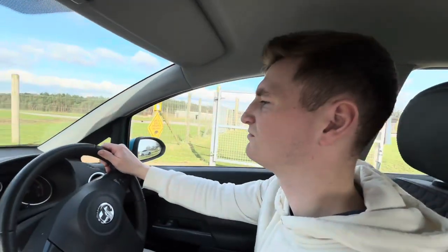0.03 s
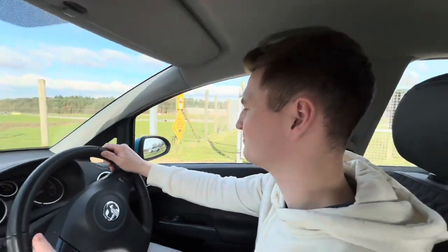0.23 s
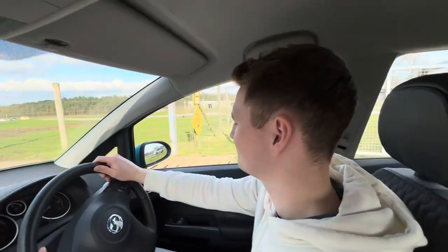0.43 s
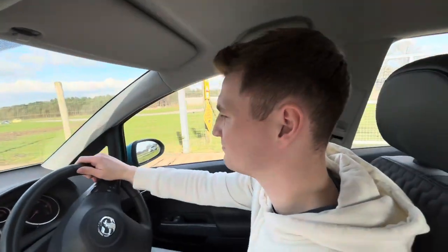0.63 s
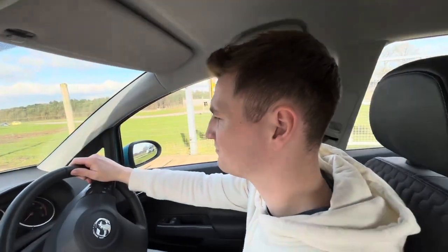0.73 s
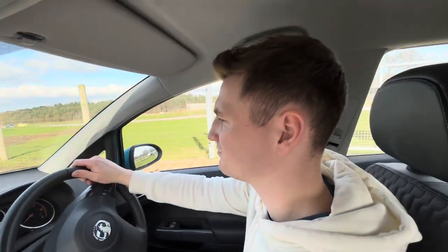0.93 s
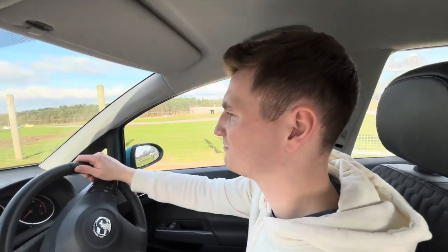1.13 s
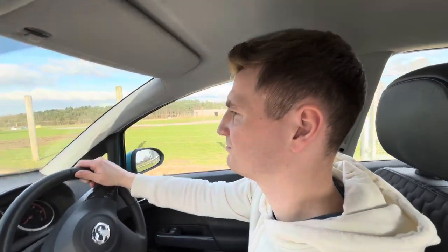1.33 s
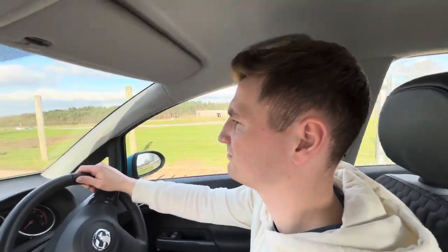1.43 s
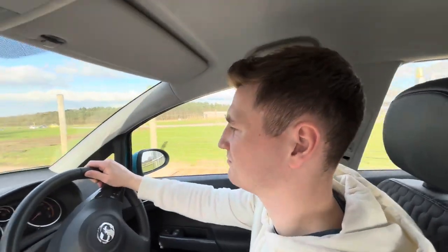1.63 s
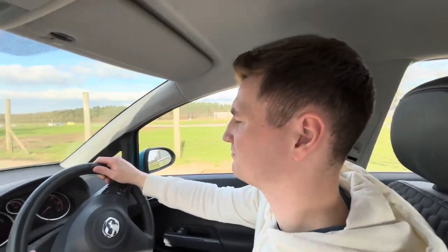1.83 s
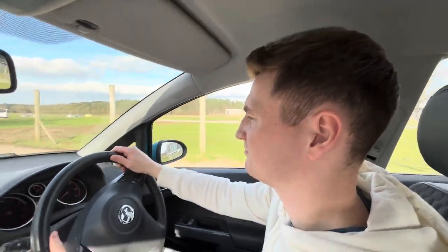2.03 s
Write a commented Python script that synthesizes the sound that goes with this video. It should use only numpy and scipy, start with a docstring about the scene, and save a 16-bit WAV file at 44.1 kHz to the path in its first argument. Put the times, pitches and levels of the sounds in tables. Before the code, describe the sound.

Car cabin rumble, deep and uneven, swelling with stone knocks, rut thuds, gritty crunch and trim ticks

```python
"""Inside a small car that rolls slowly onto a rough track; two seconds told in order. Boom (a wavering sine)
and judder (low noise) open with a few stone knocks (swelling sines), an early clack (ringing noise) and a
hollow bump with a firm thud. At 0.3 s the rumble swells with dense knocks, tyre drone, more clacks and
crunching grit (random grains). From 0.7 s wheels thud into ruts and loose trim ticks (ringing modes); from 1 s
come scuffs and brushing (grains), probably hands and sleeves at the wheel. A dry snap falls at 1.6 s over hiss."""
import sys
import numpy as np
from scipy import signal
from scipy.io import wavfile
from scipy.ndimage import uniform_filter1d

SR = 44100
rng = np.random.default_rng(int(sys.argv[2]) if len(sys.argv) > 2 else 0)


def generate_wav(sig):
    """Save sig (samples, or channels by samples) to the path in sys.argv[1] as 16-bit PCM at SR."""
    pcm = np.round(np.clip(np.atleast_2d(sig).T, -1, 1) * 32767).astype(np.int16)
    wavfile.write(sys.argv[1], SR, pcm)


N = 91287
T = np.arange(N) / SR  # seconds


def from_db(db):
    """Decibels to gain."""
    return 10 ** (np.asarray(db) / 20)


def rms_one(x):
    """Scale to unit power."""
    return x / np.sqrt(np.mean(x ** 2) + 1e-20)


def level(rows):
    """Gain over time, gliding in dB between (s, dB) rows."""
    return from_db(np.interp(T, *np.transpose(rows)))


def at_hz(points, hz):
    """Read a spectrum on a log-frequency axis."""
    freqs, values = np.transpose(points)
    return np.interp(np.log(hz), np.log(freqs), values)


def pan(db):
    """Left and right gains for a left-minus-right level difference."""
    return from_db(np.array([[db], [-db]]) / 2)


def drift(rate_hz):
    """Slow random wander with spread 1: noise through two equal one-pole lowpasses."""
    step = 40  # samples between the points of the wander
    r = np.exp(-2 * np.pi * step * rate_hz / SR)
    settle = 2000  # points dropped while the filter settles
    points = rng.standard_normal(N // step + 2 + settle)
    slow = signal.lfilter([1], [1, -2 * r, r * r], points)[settle:]
    return np.interp(np.arange(N) / step, np.arange(len(slow)), rms_one(slow))


def band_filter(x, cutoff_hz, kind):
    """Second-order Butterworth filter."""
    return signal.sosfilt(signal.butter(2, cutoff_hz, kind, fs=SR, output="sos"), x)


def noise():
    """Unrelated white noises for even and odd bands, middle and side."""
    return rng.standard_normal((2, 2, N))


def grains(per_s, spread_db):
    """Random tiny impacts of uneven size, in the same layout as noise()."""
    born = rng.random(N) < per_s / SR
    hits = noise() * born
    size_db = spread_db * np.minimum(rng.exponential(1, N), 4)
    return rms_one(hits * from_db(size_db)) + 1e-18


# Stereo likeness of the coloured noises. Each row: frequency in Hz, likeness from -1 to 1 (clipped beyond).
LIKENESS = [(60, 0.66), (130, 1.1), (290, 0.48), (520, 0), (850, -0.07), (1410, .5), (3100, 0.2),
            (9000, -0.18), (12000, 1.2)]
# Their stereo balance. Each row: frequency in Hz, left minus right level in dB.
BALANCE = [(40, 6.5), (70, 0.5), (160, -0.5), (350, 0.5), (700, 3.5), (1300, 3), (2400, 1.5), (4400, 7.5),
           (8000, -0.5), (13000, -5.5)]


def coloured(drive, colour, patchy_db):
    """Shape a drive in third-octave stereo bands, each flickering by itself; unit power."""
    out = np.zeros((2, N))
    edges = 22 * 2 ** (np.arange(30) / 3)
    for k, (low, high) in enumerate(zip(edges, edges[1:])):
        hz = np.sqrt(low * high)
        flicker = drift(8.9)
        if not colour[0][0] / 2 < hz < colour[-1][0] * 2:
            continue
        mid, side = band_filter(drive[k % 2], [low, high], "band")
        alike = np.clip(at_hz(LIKENESS, hz), -1, 1)
        stereo = np.sqrt(1 + alike) * mid + np.sqrt(1 - alike) * side * [[1], [-1]]
        gain = from_db(at_hz(colour, hz) + patchy_db * flicker) * pan(at_hz(BALANCE, hz))
        out += gain * stereo
    return rms_one(out)


def steadied(x, share, span_s):
    """Even out the chance swells of a narrow noise; share 1 would flatten them fully."""
    power = uniform_filter1d(np.mean(x ** 2, axis=0), int(span_s * SR))
    return rms_one(x / (power + 1e-6) ** (share / 2))


def strokes(rows):
    """Summed envelopes that rise straight and die away exponentially."""
    out = 0
    for s, db, rise, decay in rows:
        attack = np.clip((T - s) / rise, 0, 1)
        out = out + from_db(db) * attack * np.exp(-np.maximum(T - s - rise, 0) / decay)
    return out


def thud(s, hz, rise_s):
    """A cushioned blow: a resonance that swells for rise_s and then dies."""
    age = np.maximum(T - s, 0)
    swell = (age / rise_s * np.exp(1 - age / rise_s)) ** 2
    return swell * np.sin(2 * np.pi * hz * age)


def resonate(x, modes):
    """Parallel two-pole resonances of (Hz, gain dB, width Hz)."""
    out = 0
    for hz, gain_db, width_hz in modes:
        r = np.exp(-np.pi * width_hz / SR)
        zeros = [(1 - r * r) / 2, 0, (r * r - 1) / 2]
        poles = [1, -2 * r * np.cos(2 * np.pi * hz / SR), r * r]
        out = out + from_db(gain_db) * signal.lfilter(zeros, poles, x)
    return out


CABIN_T60_S = 0.094
CABIN_DB, CRUNCH_CABIN_DB = -10, -7  # tail against direct sound, for blows and for the crunch


def cabin(x, wet_db):
    """Direct sound plus a short padded tail, different at each ear; the power stays about the same."""
    age = T[:SR // 4]
    tail = rng.standard_normal((2, len(age))) * from_db(-60 * age / CABIN_T60_S)
    tail /= np.sqrt(np.sum(tail ** 2, axis=1, keepdims=True))
    wet = from_db(wet_db)
    reverb = signal.fftconvolve(np.atleast_2d(x), tail, axes=1)[:, :N]
    return (x + wet * reverb) / np.hypot(1, wet)


# The tyres strike stones. Each row: start in seconds, level in dB before KNOCK_DB, pitch of the knock in Hz.
KNOCKS = [(0.05, -27.5, 194), (0.265, -28.5, 202), (.352, -12, 144.4), (0.438, -15, 217),
          (0.461, -15.5, 228.5), (.495, -12, 172), (.556, -11, 204), (0.583, -11, 177), (.694, -22.5, 174),
          (.737, -12.5, 163.3), (.772, -25, 222), (0.815, -14, 195), (.860, -22.5, 248), (.941, -10, 173),
          (0.989, -19.5, 215), (1.064, -13, 213.5), (1.094, -17, 217), (1.166, -12, 193), (1.326, -13, 170),
          (1.406, -7.5, 189), (1.451, -15, 218), (1.533, -14, 197.6), (1.662, -11.5, 172),
          (1.781, -13, 187), (1.826, -18, 194), (1.869, -13.5, 169), (1.905, -16, 204), (1.935, -11.5, 194)]
KNOCK_RISE_S, KNOCK_DB, KNOCK_PAN_DB = 0.0054, -2.5, 1.8
KNOCK_OVERTONE, KNOCK_OVERTONE_DB = 1.454, -14  # pitch ratio, level against the main pitch
# Swell of the tyres' drone. Each row: time in seconds, level in dB.
DRONE = [(0, -42), (.19, -46.5), (.28, -36.5), (.45, -33), (.85, -28.5), (1.1, -36), (1.27, -43),
         (1.45, -32.5), (1.7, -30.5), (2.05, -30.5)]
# Tone of the drone. Each row: frequency in Hz, relative density in dB per Hz.
DRONE_COLOUR = [(80, -18.5), (140, -6), (220, 2.5), (270, -8), (340, -11.5), (450, -16.5), (800, -35.5)]


def tyres():
    """Small stones keep the tyres droning as low noise; larger ones give hollow two-pitch knocks."""
    drone = steadied(coloured(noise(), DRONE_COLOUR, patchy_db=1.0), share=0.68, span_s=0.018)
    knocks = 0
    for s, db, hz in KNOCKS:
        overtone = from_db(KNOCK_OVERTONE_DB) * thud(s, hz * KNOCK_OVERTONE, KNOCK_RISE_S)
        knocks = knocks + from_db(db + KNOCK_DB) * (thud(s, hz, KNOCK_RISE_S) + overtone)
    return level(DRONE) * drone + cabin(knocks, CABIN_DB) * pan(KNOCK_PAN_DB)


# A wheel drops into a rut. Each row: start in seconds, level in dB before RUT_DB, pitch in Hz.
RUTS = [(0.756, -18, 73), (0.837, -15, 65.7), (1.331, -13.5, 75.2), (1.452, -16, 70), (1.555, -16, 75.6),
        (1.622, -14.5, 103), (1.733, -11, 108), (1.802, -9, 94.3), (1.925, -13.5, 86.5),
        (1.989, -20.5, 68.6)]
RUT_RISE_S, RUT_DB = 0.01, 3
# Swell of the suspension's judder. Each row: time in seconds, level in dB before JUDDER_DB.
JUDDER = [(0.0, -36.5), (0.22, -39), (0.32, -26), (0.8, -22.5), (0.91, -26), (1.32, -29), (1.35, -22.5),
          (1.42, -32), (1.47, -22), (1.51, -29.5), (1.55, -19.5), (2.05, -21)]
# Tone of the judder. Each row: frequency in Hz, relative density in dB per Hz.
JUDDER_COLOUR = [(25, -13.5), (45, -12.5), (62, 0.5), (85, -1.5), (115, -10), (150, -11.5), (220, -23.5),
                 (400, -47.5)]
JUDDER_DB, JUDDER_STEADINESS = 3, 0.74


def suspension():
    """Judder of steadied low noise that swells and dips, and a heavy, low resonant thud at each rut."""
    judder = steadied(coloured(noise(), JUDDER_COLOUR, patchy_db=0.5), JUDDER_STEADINESS, span_s=0.053)
    ruts = sum(from_db(db + RUT_DB) * thud(s, hz, RUT_RISE_S) for s, db, hz in RUTS)
    return from_db(JUDDER_DB) * level(JUDDER) * judder + cabin(ruts, CABIN_DB)


# Swell of the cabin's deepest boom. Each row: time in seconds, level in dB before BOOM_DB and flutter.
BOOM = [(0.0, -28.5), (0.11, -34), (0.22, -49), (0.32, -27.5), (0.68, -21.5), (0.99, -36), (1.1, -23),
        (1.38, -25.5), (1.4, -33), (1.59, -21), (1.84, -35), (1.87, -23), (1.89, -30), (2.05, -21.5)]
BOOM_HZ, BOOM_WANDER_HZ = 40.5, 2.64  # centre and spread of the pitch
BOOM_DB, BOOM_FLUTTER_DB, BOOM_PAN_DB = 1.5, -1.2, 3.8


def boom():
    """The cabin air throbs around one deep, unsteady pitch."""
    phase = 2 * np.pi * np.cumsum(BOOM_HZ + BOOM_WANDER_HZ * drift(5.83)) / SR
    flutter = from_db(BOOM_DB + BOOM_FLUTTER_DB * drift(6.1))
    return level(BOOM) * flutter * np.sqrt(2) * np.sin(phase) * pan(BOOM_PAN_DB)


# Swell of the grit under the tyres. Each row: time in seconds, level in dB before GRIT_DB.
GRIT = [(.19, -54), (.29, -49), (.40, -50.5), (.48, -49), (.85, -47), (1.0, -46.5), (1.15, -50),
        (1.29, -53.5), (1.33, -48.5), (1.40, -47), (1.55, -46), (1.65, -39), (1.87, -44.5), (2.05, -44)]
# Tone of its crunch. Each row: frequency in Hz, relative density in dB per Hz.
GRIT_COLOUR = [(200, -4), (420, 1.5), (580, -3), (820, -7.5), (1100, -9.5), (1800, -15), (3000, -19.5),
               (4500, -28), (7000, -30), (10000, -35), (12000, -47)]
GRIT_DB, STONES_PER_S, STONE_SPREAD_DB = 5.5, 2500, 2.5
# Dull scuffs, probably tyres shoving loose dirt.
# Each row: start in seconds, relative level in dB, rise in seconds, decay in seconds.
SCUFFS = [(1.0, -38, 0.01, 0.024), (1.455, -35.5, 0.014, 0.035), (1.599, -34, 0.008, 0.02),
          (1.620, -31, 0.0046, 0.013), (1.725, -29, 0.02, 0.019)]
# Tone of the scuffs. Each row: frequency in Hz, relative density in dB per Hz.
SCUFF_COLOUR = [(200, -12), (450, -2), (800, 2), (1100, -7), (1800, -14), (3000, -21), (6000, -34),
                (12000, -55)]


def grit():
    """Dense random impacts crunch, with a few longer scuffs of finer grains."""
    stones = grains(STONES_PER_S, STONE_SPREAD_DB)
    crunch = from_db(GRIT_DB) * level(GRIT) * coloured(stones, GRIT_COLOUR, patchy_db=3.5)
    dirt = grains(per_s=4500, spread_db=2.0)
    return crunch + strokes(SCUFFS) * coloured(dirt, SCUFF_COLOUR, patchy_db=2.0)


# Single stones clack under the floor; the row at 0.216 s is instead the firm thud of the hollow bump. Each row:
# start in seconds, relative level in dB, pitch in Hz.
CLACKS = [(.122, -44, 850), (.216, -36, 580), (.515, -35, 650), (.643, -37, 660), (.708, -41, 1600),
          (.868, -37, 900), (1.202, -45, 900), (1.442, -37, 950), (1.602, -30, 800), (1.636, -32, 750),
          (1.873, -34, 1100), (1.970, -44, 3300)]
CLACK_DECAY_S, CLACK_Q = 0.007, 1.1  # Q of each of two resonances in a row


def clacks():
    """Each clack is a short, hollow burst of noise resonating around its own pitch."""
    out = 0
    for s, db, hz in CLACKS:
        mode = [(hz, 0, hz / CLACK_Q)]
        ring = resonate(resonate(rng.standard_normal((2, N)), mode), mode)
        out = out + strokes([(s, db, .001, CLACK_DECAY_S)]) * rms_one(ring)
    return out


# Brushing strokes. Each row: start in seconds, relative level in dB, rise in seconds, decay in seconds.
BRUSHES = [(1.0, -42.5, 0.019, 0.016), (1.597, -42, 0.019, 0.025), (1.672, -39, 0.037, 0.025),
           (1.735, -34.5, 0.017, 0.013), (1.797, -39, 0.035, 0.027), (1.94, -46, 0.026, 0.11)]
# Tone of the brushing. Each row: frequency in Hz, relative density in dB per Hz.
BRUSH_COLOUR = [(600, -9.5), (1600, 4.5), (2200, 6), (3000, 6.5), (4500, -5), (5800, 2.5), (8000, -8),
                (10000, -9.5), (12000, -28), (15000, -17)]


def brushing():
    """Fine friction grains under each stroke."""
    friction = grains(per_s=9000, spread_db=0.5)
    return strokes(BRUSHES) * coloured(friction, BRUSH_COLOUR, patchy_db=2.5)


# Resonances of the dash and door panels. Each row: frequency in Hz, gain in dB, width in Hz.
PANELS = [(441, -2.5, 85), (615, -16, 15), (800, -19, 6), (903, -1, 30), (1206, -3.5, 26), (1410, -5, 11),
          (1670, -11, 24), (1820, -9.5, 28), (2330, -6.5, 23), (2900, -8, 19), (3330, -12, 56),
          (3787, -2, 65)]
PANEL_DB = -2.5  # on direct sound and ringing together


def panels(x):
    """The panels ring along with whatever shakes them."""
    return from_db(PANEL_DB) * (x + resonate(x, PANELS))


# A loose bit of trim ticks. Each row: start in seconds, relative level in dB, brightness in dB per octave.
TICKS = [(.709, -68, 3), (0.777, -51, -5), (0.815, -53, -5), (.900, -57, 7), (1.023, -52, -8),
         (1.157, -58, -7), (1.198, -60, 4), (1.344, -57, 2), (1.490, -53, -5), (1.622, -43, -6),
         (1.745, -48, -2)]
# What it rings with. Each row: frequency in Hz, relative level in dB, fall by 60 dB in seconds.
TRIM = [(2850, -2.5, .06), (5000, -8, 0.06), (5800, -3.5, 0.09), (10050, -6, 0.07), (13480, -17, 0.076),
        (14780, -17, .08)]
TRIM_DB, TRIM_PIVOT_HZ, TICK_SPREAD_DB = -2, 6030, 2.5  # brightness tilts around the pivot
TICK_NOISE_DB, TICK_NOISE_DECAY_S, TICK_NOISE_BAND_HZ = -8, 0.0045, [2500, 9000]
SNAP_S, SNAP_DB, SNAP_DECAY_S, SNAP_LOW_HZ = 1.600, -42, .003, 7000  # level before filter and cabin


def trim():
    """Light ticks scrape and ring the loose part, each with its own mix of modes; one dry plastic snap."""
    scrape = rms_one(band_filter(rng.standard_normal((2, N)), TICK_NOISE_BAND_HZ, "band"))
    out = scrape * strokes([(s, db + TICK_NOISE_DB, .001, TICK_NOISE_DECAY_S) for s, db, _ in TICKS])
    for s, db, tilt_db in TICKS:
        age = np.maximum(T - s, 0)
        for hz, mode_db, t60 in TRIM:
            brightness_db = tilt_db * np.log2(hz / TRIM_PIVOT_HZ)
            chance_db = rng.normal(0, TICK_SPREAD_DB, (2, 1))  # separate at each ear
            strength_db = TRIM_DB + db + mode_db + brightness_db + chance_db
            out += from_db(strength_db - 60 * age / t60) * np.sin(2 * np.pi * hz * age)
    crack = band_filter(rng.standard_normal(N), SNAP_LOW_HZ, "high")
    snap = crack * strokes([(SNAP_S, SNAP_DB, .001, SNAP_DECAY_S)])
    return out + cabin(snap, CABIN_DB)


# A hollow bump just before the rumble swells.
# Each row: start in seconds, level in dB, rise in seconds, decay in seconds.
BUMP = [(.199, -36, .010, .045)]
# Its resonances. Each row: frequency in Hz, gain in dB, width in Hz.
BUMP_RING = [(460, 0, 80), (646, 0, 50), (937, -4, 70), (1170, -11, 90)]
BUMP_TOP_HZ = 1300


def bump():
    """A short, dull shudder of a hollow part: resonating noise with its top rolled off."""
    shudder = band_filter(resonate(rng.standard_normal((2, N)), BUMP_RING), BUMP_TOP_HZ, "low")
    return strokes(BUMP) * rms_one(shudder)


# Swell of the hiss. Each row: time in seconds, level in dB.
AIR = [(.1, -62.5), (.22, -60), (.36, -60.5), (.52, -64), (.75, -59), (.95, -65), (1.12, -57.5),
       (1.19, -64.5), (1.24, -71), (1.28, -63), (1.4, -61), (1.9, -56)]
# Tone of the hiss. Each row: frequency in Hz, relative density in dB per Hz.
AIR_COLOUR = [(400, 8.5), (800, 5.5), (1300, 4), (3000, 2), (6000, 2), (9800, -1.5), (12000, -18.5),
              (15000, -9)]


def hiss():
    """A faint bed of flickering stereo noise that swells and dips."""
    return level(AIR) * coloured(noise(), AIR_COLOUR, patchy_db=1.8)


RIGHT_LAG_S = .0003


def scene():
    """Road and cabin sounds reach the left side first; ticks, hiss and the bump lie on top."""
    rumble = boom() + suspension() + tyres()
    crunch = cabin(panels(grit() + clacks() + brushing()), CRUNCH_CABIN_DB)
    left, right = rumble + crunch
    body = np.array([left, np.interp(T - RIGHT_LAG_S, T, right)])
    return body + trim() + hiss() + bump()


DIP_HZ, DIP_Q, CUTOFF_HZ = 12100, 7, 15800


def record(dry):
    """A notch dips the top octave; above that the top is cut steeply."""
    dipped = signal.lfilter(*signal.iirnotch(DIP_HZ, DIP_Q, fs=SR), dry)
    return signal.sosfilt(signal.ellip(10, .1, 80, CUTOFF_HZ, fs=SR, output="sos"), dipped)


dry = scene()
out = record(dry)
generate_wav(out)
```